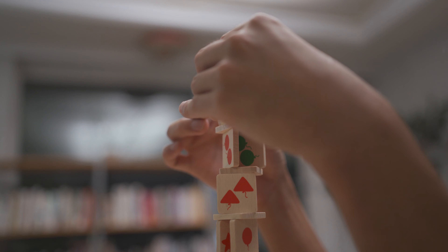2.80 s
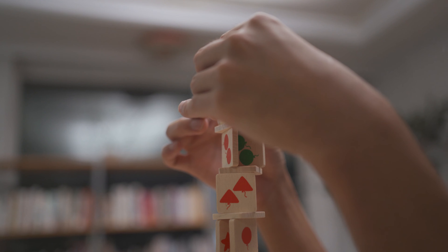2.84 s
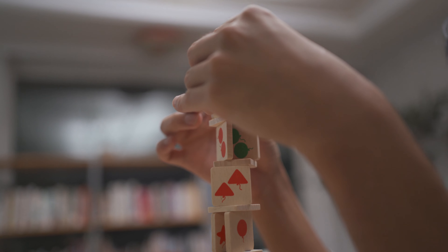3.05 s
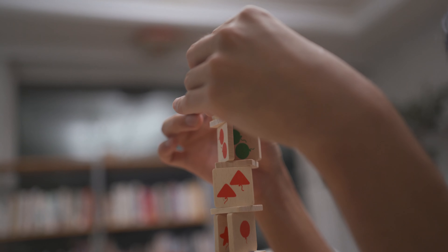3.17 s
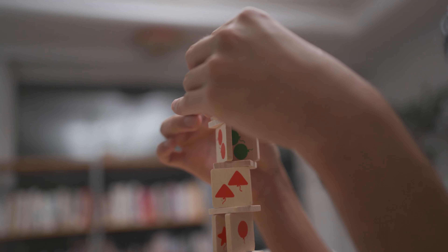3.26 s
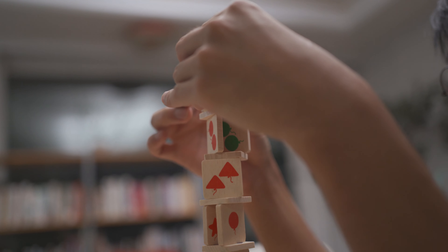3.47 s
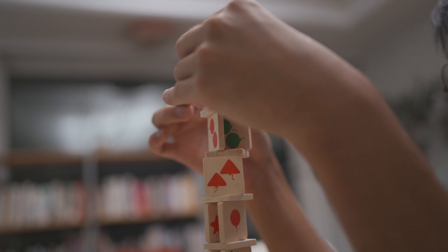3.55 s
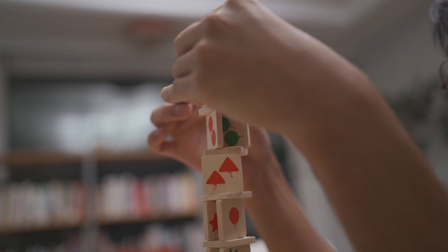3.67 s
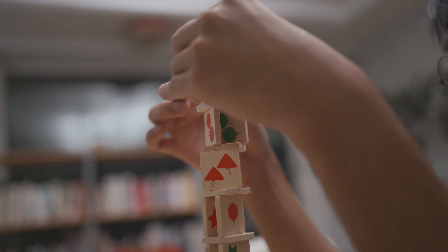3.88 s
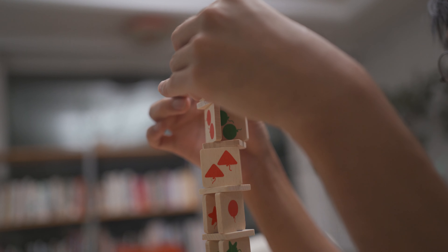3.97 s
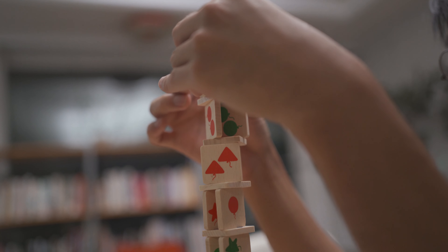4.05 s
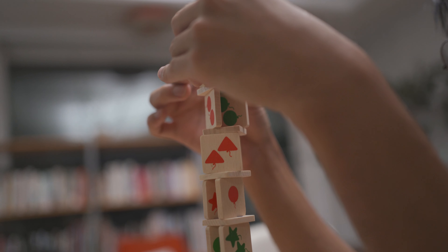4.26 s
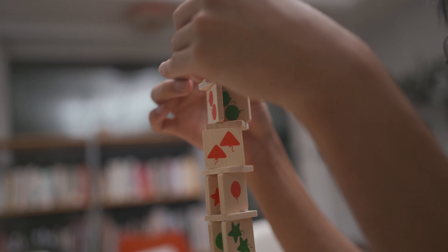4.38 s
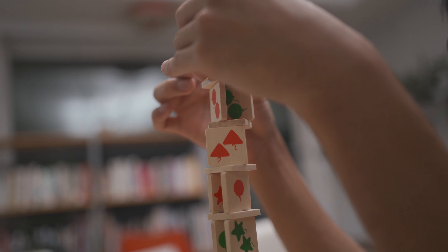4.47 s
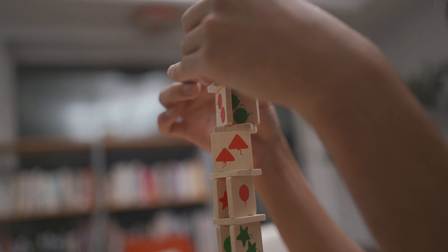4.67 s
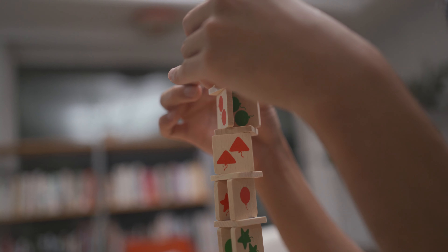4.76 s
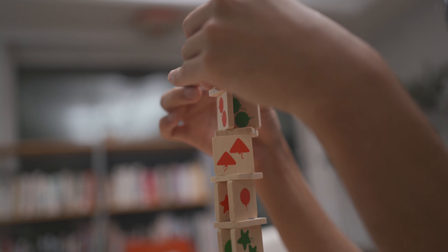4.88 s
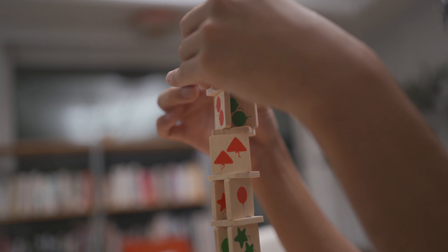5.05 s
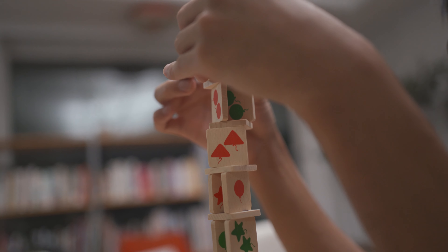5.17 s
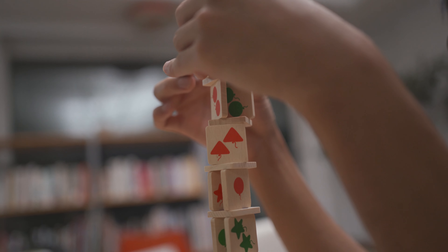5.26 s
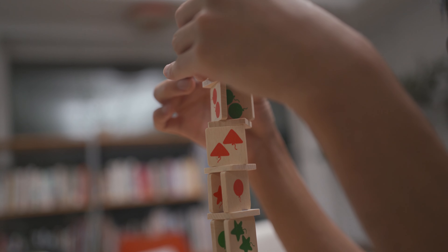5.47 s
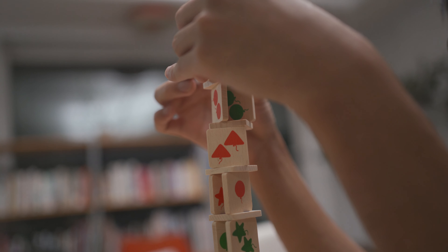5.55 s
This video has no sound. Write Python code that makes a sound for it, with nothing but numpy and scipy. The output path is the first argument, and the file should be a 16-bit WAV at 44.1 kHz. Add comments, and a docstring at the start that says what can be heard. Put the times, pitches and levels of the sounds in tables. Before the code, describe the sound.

Wooden toy blocks clack and slide against each other in a slightly echoing room, with scattered light knocks and a steady background hiss.

```python
"""Small wooden blocks knock together in a lively living room, heard mostly through its reverberation.
First they clatter and slide, with one metallic clank, while something heavier shifts on the table.
Scattered knocks follow, each ringing the blocks' damped modes, and at 3.3 s a faint far whine rises.
Near 4.6 s a flurry of knocks sets a metal rod chinking; the loudest knock comes at 5.2 s.
Throughout, a ventilation murmur, microphone hiss and faint mains hum lie underneath."""
import sys
import numpy as np
from scipy import signal
from scipy.fft import rfft, irfft
from scipy.io import wavfile

SR = 44100
rng = np.random.default_rng(int(sys.argv[2]) if len(sys.argv) > 2 else 0)


def wav_record(signal):
    """Record a signal, one row per channel, as 16-bit PCM in the file named by sys.argv[1]."""
    frames = np.transpose(np.atleast_2d(signal))
    bounded = np.clip(frames, -1, 1)
    # unit amplitude maps onto the largest positive 16-bit level
    quanta = np.round(bounded * 32767).astype(np.int16)
    wavfile.write(sys.argv[1], SR, quanta)


N = 247842

# Modes (f/Hz, relative level/dB, T60/s) of a block: its body, then two higher sets woken by hard contact
BLOCK_MODES = [(1580, -11.5, 0.018), (1844, -2, 0.013), (2230, -11.5, 0.019), (2547, -7, 0.019),
               (3150, 5, 0.0061), (4000, -1, 0.0049)]
CRACK_MODES = [(3586, 1, 0.01), (4504, -10, 0.013), (5165, 0.5, 0.0046), (6010, 6, 0.0025)]
SIZZLE_MODES = [(7130, 0, 0.017), (9850, -3.5, 0.0066), (13050, 1, 0.005), (15600, -2, 0.0032)]
# Modes (f/Hz, relative level/dB, T60/s) of the cavity between the blocks and of the table beneath
CAVITY_MODES = [(853, 6.5, 0.0087), (1208, -6, 0.078)]
THUD_MODES = [(204, -17, 0.075), (287, -12, 0.22), (449.6, 17, 0.048)]
# Contacts: t/s, level/dB, ring f/Hz, relative ring level/dB, hardness/dB, weight/dB
IMPACTS = [(0.0, -34.5, 1730, -2, -4.5, 5), (0.0384, -20.5, 1290, -3, -8, -2.5),
           (0.0414, -26, 3460, -13, -2.5, 4), (0.0647, -31, 3280, -7, -9, -4),
           (0.1872, -23.5, 1370, -1.5, -1.5, -6), (0.2005, -25.5, 1300, -5, 1, -0.5),
           (0.4732, -27, 1450, -4.5, -6, 0.5), (0.9443, -41, 1410, 0, 0.5, -20),
           (0.9694, -43, 2000, -1, -8, -18), (1.3396, -57.5, 880, 17.5, -20, -10),
           (1.3958, -46, 2260, 6.5, -1, 7), (1.4402, -41, 1650, 3, -4, 8), (1.48, -38, 1440, 0.5, -6, 5.5),
           (1.579, -39.5, 1400, -2, -3, -3), (1.6618, -53.5, 900, 11, 0, 5),
           (1.9957, -37, 1230, -0.5, -7.5, -5.5), (2.0290, -26.5, 790, 0, -11.5, -22),
           (2.0676, -27, 1510, -1, -7, -18), (2.4527, -43, 1340, -1, -7, 1),
           (2.474, -36, 1540, -5, -3.5, -2), (2.5353, -29.5, 1240, 0.5, -3, -8.5),
           (2.5479, -27.5, 2220, -3.5, -5.5, -6), (2.9116, -43, 2600, -15, -10, -6),
           (3.0142, -57.5, 810, 17.5, -15, -10), (3.2786, -50.5, 1670, 4, 4, 8.5),
           (3.921, -34.5, 1770, -19, -14, -24), (4.0247, -40, 2300, -4, -5, -9),
           (4.224, -42.5, 1660, -15, -18, -18), (4.2723, -47.5, 1780, 2.5, -6, 1),
           (4.3575, -44.5, 820, 5.5, -9, -13), (4.491, -23, 2480, -17, -16, -25),
           (4.5031, -25.5, 2440, 1, -13.5, -32), (4.5884, -25.5, 2550, 0, 2, -12),
           (4.6011, -24, 2000, -2, -4, -7), (4.6544, -18.5, 1516, -1.5, 3, -11.5),
           (4.6662, -16.5, 2110, -6, -14, -14), (4.9930, -28.5, 2550, -7.5, -7, -13.5),
           (5.012, -39, 2330, 6.5, -9, -3.5), (5.1818, -18, 2535, 8.5, -0.5, -19),
           (5.1966, -10.5, 1560, -3, 1, -12.5)]
CLACK_HZ, CRACK_HZ, SIZZLE_HZ = (1120, 3300), (3400, 6300), (6600, 15400)
RADIATION_HZ = 630  # a block is too small to radiate well below this


def knocks():
    """Impact excitation: hard contacts wake a block's high modes, heavy ones the cavity and the table."""
    out, click = np.zeros(N), signal.unit_impulse(8192)
    clack, crack, sizzle = (unit_energy(filtered(filtered(click, band), band[1], "low"))
                            for band in (CLACK_HZ, CRACK_HZ, SIZZLE_HZ))
    for s, db, ring_hz, ring_db, hard_db, weight_db in IMPACTS:
        body = filtered(unit_energy(struck(BLOCK_MODES, spread_db=3)), CLACK_HZ[1], "low")
        wood = unit_energy(clack + from_db(0.5) * body)
        wood += from_db(ring_db) * unit_energy(resonator(click, ring_hz, t60=0.015))
        wood += from_db(weight_db) * unit_energy(struck(CAVITY_MODES, spread_db=2))
        treble = (hard_db, -crack, CRACK_MODES), (1.9 * hard_db - 6, sizzle, SIZZLE_MODES)
        for treble_db, transient, modes in treble:
            ringing = filtered(unit_energy(struck(modes, spread_db=3)), CRACK_HZ[0], "high")
            wood += from_db(treble_db) * unit_energy(transient + from_db(-6) * ringing)
        wood = filtered(filtered(wood, RADIATION_HZ, "high"), RADIATION_HZ, "high")
        thud = filtered(unit_energy(struck(THUD_MODES, spread_db=2)), 200, "high")
        add(out, s, from_db(db) * (wood + from_db(0.68 * weight_db - 9.5) * thud))
    return out


# Modes of the rod and of the clanking metal: f/Hz, relative level/dB, T60/s
ROD_MODES = [(3620, 0, 0.051), (5240, 7, 0.05), (7100, 5, .04), (9060, 11.5, 0.036), (11200, 13.5, 0.025),
             (13650, 10, 0.025)]
CLANK_MODES = [(3400, 5.5, 0.035), (4080, -25, 0.032), (5550, -3.5, 0.02), (7560, -9.5, 0.05),
               (8300, -2, 0.014), (11460, -8.5, 0.027)]
# Touches on the rod: t/s, level/dB
ROD_TOUCHES = [(4.59, -71), (4.601, -61.5), (4.666, -50)]
CLANK_S, CLANK_DB = 0.042, -40


def metal():
    """Free vibration of thin metal in inharmonic modes: one early clank, three late touches on a rod."""
    out = np.zeros(N)
    for s, db in ROD_TOUCHES:
        add(out, s, from_db(db) * struck(ROD_MODES, spread_db=1))
    add(out, CLANK_S, from_db(CLANK_DB) * struck(CLANK_MODES, spread_db=1))
    return filtered(out, 1400, "high")


# Spectrum of wood rubbing on wood: f/Hz, relative spectral level/dB
FRICTION_SPECTRUM = [(120, -27), (200, -7.5), (570, 2.5), (864, -3), (1460, -1), (1810, -4), (2380, -3),
                     (6770, -13.5), (15000, -19.5)]
# One block dragged over another: t/s, hold/s, level/dB, relative level of added treble/dB
DRAGS = [(0.098, 0.051, -54.5, 0.5), (0.22, 0.077, -62, -26), (0.374, 0.027, -57, 5)]
GRAINS_PER_S, DRAG_TREBLE_HZ = 1500, (3880, 9800)


def slides():
    """Sliding friction: dense, uneven micro-impacts of wood on wood merge into a scrape."""
    contacts = rng.random(N) < GRAINS_PER_S / SR
    strength = from_db(5.6 * np.minimum(rng.exponential(1, N), 3))
    grains = contacts * strength * rng.choice([-1, 1], N)
    hz = np.maximum(np.arange(N // 2 + 1) * SR / N, 1)
    scrape = unit_rms(irfft(rfft(grains) * from_db(at_hz(FRICTION_SPECTRUM, hz)), N))
    treble = filtered(scrape, DRAG_TREBLE_HZ)
    return sum(stroke(s, hold, db, rise_s=0.023, fall_db_per_s=199) * (scrape + from_db(lift) * treble)
               for s, hold, db, lift in DRAGS)


# Low modes of the table: f/Hz, bandwidth/Hz, relative level/dB
RUMBLE_BANDS = [(70.5, 33, -29), (121, 29, -11.5), (197, 45, -9.5), (268.4, 35, -4)]
# Jolts from something heavier shifting on it: t/s, hold/s, level/dB
TABLE_JOLTS = [(0.0, 0.005, -48.5), (0.036, 0.1, -42), (0.255, 0.031, -49), (0.5, 0.14, -62.5)]


def table_rumble():
    """Forced vibration: each jolt drives the table's low modes as narrow bands of noise."""
    envelope = sum(stroke(*jolt, rise_s=0.016, fall_db_per_s=110) for jolt in TABLE_JOLTS)
    return envelope * narrow_bands(RUMBLE_BANDS)


# The heavier thing rubbing on the table: t/s, hold/s, level/dB
TABLE_RUBS = [(0.02, 0.027, -37.5), (0.331, 0.062, -44), (0.45, 0.17, -49)]


def rubs():
    """Friction noise follows sliding speed: each rub sinks in pitch as it slows."""
    return sum(stroke(s, hold, db, rise_s=0.042, fall_db_per_s=194)
               * glide(s, hz=551.3, hz_per_s=-300, width_hz=213) for s, hold, db in TABLE_RUBS)


# Reverberation time: f/Hz, T60/s
REVERB_TIMES = [(100, 0.44), (500, 0.44), (2000, 0.44), (6000, 0.44), (14000, 0.38)]
# Balance of the reflections: f/Hz, left minus right level/dB
REVERB_BALANCE = [(60, 2), (240, 2), (950, 0.5), (3770, 1), (15000, 2)]
# Likeness of the reflections at the two ears: f/Hz, left-right correlation
REVERB_CORRELATION = [(100, 0.7), (250, 1), (600, 0.79), (2000, 0.55), (5000, 0.0061), (15000, -0.048)]
DIRECT_DB, REVERB_DB, EARLY_DB = 3.5, -13.5, 5.5
EARLY_S, BUILD_S, PLATEAU_S = 0.0031, 0.0043, 0.033


def room(x):
    """Reverberation: after the direct sound and early burst, reflections build, hold and decay by band."""
    t = np.arange(SR * 3 // 4) / SR
    decay_s = np.maximum(t - PLATEAU_S, 0)
    diffuse = np.zeros((2, len(t)))
    for hz, noise in third_octaves(len(t), REVERB_CORRELATION):
        balance_db = at_hz(REVERB_BALANCE, hz) / 2 * np.array([[1], [-1]])
        diffuse += noise * from_db(balance_db - 60 * decay_s / at_hz(REVERB_TIMES, hz))
    onset = 1 - np.exp(-t / BUILD_S) + from_db(EARLY_DB) * np.exp(-t / EARLY_S)
    response = from_db(REVERB_DB) * diffuse * onset / np.std(diffuse[:, :2048])
    return from_db(DIRECT_DB) * x + signal.fftconvolve(x[None], response, axes=1)[:, :N]


def whine(s=3.3):
    """Narrow-band noise is heard as a wavering tone: far off, it swells, climbs and fades."""
    envelope = stroke(s, hold_s=0.4, db=-63, rise_s=0.059, fall_db_per_s=150)
    return envelope * glide(s, hz=1645, hz_per_s=680, width_hz=90)


# Murmur and hiss: f/Hz, relative spectral level/dB
MURMUR_SPECTRUM = [(25, -48), (60, -30), (100, -25), (160, -12.5), (250, -6), (400, -4), (630, -0.5),
                   (900, 1.5), (1500, 1), (2200, -4), (4000, -8), (8000, -9.5), (15900, -12)]
# Their likeness at the two ears: f/Hz, left-right correlation
MURMUR_CORRELATION = [(60, .99), (200, 0.7), (550, 0.11), (1650, 0.12), (5000, 0.011), (15000, .01)]
# Droning bands in the murmur: f/Hz, bandwidth/Hz, level/dB
DRONE_BANDS = [(246.8, 19.6, -76), (439, 61, -71), (891, 170, -65.5)]
MURMUR_DB, MURMUR_PAN_DB, HUM_HZ, HUM_DB = -50.5, -0.5, 60, -92


def room_tone():
    """Superposition of background noise: wavering ventilation murmur, microphone hiss and mains hum."""
    shared_swell = 0.7 * drift(rate_hz=1.8)
    murmur = np.zeros((2, N))
    for hz, band in third_octaves(N, MURMUR_CORRELATION):
        depth_db = at_hz([(1500, 2.74), (5000, 0.31)], hz)  # the hiss is steadier than the murmur
        waver_db = depth_db * (shared_swell + drift(rate_hz=8.2))
        murmur += band * from_db(at_hz(MURMUR_SPECTRUM, hz) + waver_db)
    pan = from_db([[MURMUR_PAN_DB / 2], [-MURMUR_PAN_DB / 2]])
    hum = from_db(HUM_DB) * np.sqrt(2) * np.sin(2 * np.pi * HUM_HZ * np.arange(N) / SR)
    return from_db(MURMUR_DB) * unit_rms(murmur) * pan + narrow_bands(DRONE_BANDS) + hum


def resonator(clicks, hz, t60):
    """Damped oscillator: a unit click starts a decaying sine of amplitude 1."""
    r, w = from_db(-60 / (t60 * SR)), 2 * np.pi * hz / SR
    return signal.lfilter([0, np.sin(w)], [1, -2 * r * np.cos(w), r * r], clicks + 1e-18)


def struck(modes, spread_db):
    """Modal superposition: one blow starts every mode with a random strength and sign."""
    click, draws = signal.unit_impulse(8192), rng.standard_normal((len(modes), 2))
    return sum(np.sign(polarity) * from_db(db + spread_db * scatter) * resonator(click, hz, t60)
               for (hz, db, t60), (scatter, polarity) in zip(modes, draws))


def stroke(s, hold_s, db, rise_s, fall_db_per_s):
    """Envelope of one movement: linear rise, hold, exponential decay."""
    t = np.arange(N) / SR - s
    return np.clip(t / rise_s, 0, 1) * from_db(db - fall_db_per_s * np.maximum(t - rise_s - hold_s, 0))


def glide(s, hz, hz_per_s, width_hz):
    """Quadrature modulation: a noise band of rms 1 rides a pitch that glides from time s."""
    pitch = np.maximum(hz + hz_per_s * np.maximum(np.arange(N) / SR - s, 0), 100)
    phase = 2 * np.pi * np.cumsum(pitch) / SR
    wobble = filtered(rng.standard_normal((2, N)), width_hz / 2, "low")
    return unit_rms(wobble[0] * np.cos(phase) + wobble[1] * np.sin(phase))


def narrow_bands(bands):
    """Incoherent sum of noise bands, each at its own rms level."""
    return sum(from_db(db) * unit_rms(filtered(rng.standard_normal(N), [hz - width / 2, hz + width / 2]))
               for hz, width, db in bands)


def third_octaves(size, correlation):
    """Mid-side mixing sets each band's left-right correlation; yields (centre f/Hz, stereo noise)."""
    edges, white = 28 * 2 ** np.arange(0, 9.4, 1 / 3), rng.standard_normal((2, 2, size))
    for k, (low, high) in enumerate(zip(edges, edges[1:])):
        mid, side = filtered(white[k % 2], [low, high])
        hz = np.sqrt(low * high)
        alike = np.clip(at_hz(correlation, hz), -.9, 1)
        yield hz, np.sqrt(1 + alike) * mid + np.sqrt(1 - alike) * side * [[1], [-1]]


def drift(rate_hz):
    """Slow random fluctuation of rms 1: low-passed noise, drawn at every 40th sample."""
    r = np.exp(-80 * np.pi * rate_hz / SR)
    slow = signal.lfilter([1], [1, -2 * r, r * r], rng.standard_normal(N // 40 + 2002))[2000:]
    return np.interp(np.arange(N) / 40, np.arange(len(slow)), unit_rms(slow))


def from_db(db):
    return 10 ** (np.asarray(db) / 20)


def unit_rms(x):
    return x / np.sqrt(np.mean(x ** 2) + 1e-20)


def unit_energy(x):
    return x / np.linalg.norm(x)


def filtered(x, edges_hz, kind="band"):
    return signal.sosfilt(signal.butter(2, edges_hz, kind, fs=SR, output="sos"), x)


def at_hz(points, hz):
    freqs, values = np.array(points).T
    return np.interp(np.log(hz), np.log(freqs), values)


def add(track, s, sound):
    at = max(round(s * SR), 0)
    piece = track[..., at:at + sound.shape[-1]]
    piece += sound[..., :piece.shape[-1]]


def scene():
    """Superposition: the reverberant contacts add to the table's noises, the whine and the room tone."""
    return room(knocks() + metal() + slides()) + table_rumble() + rubs() + whine() + room_tone()


def record(dry):
    """Band limiting: a steep low-pass removes everything above 16 kHz."""
    return signal.sosfilt(signal.cheby2(24, 70, 16000, fs=SR, output="sos"), dry)


dry = scene()
out = record(dry)
wav_record(out)
```